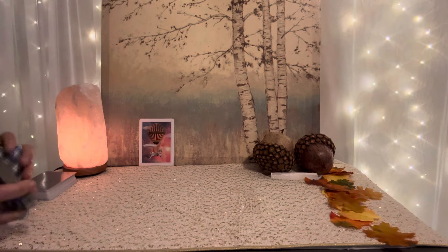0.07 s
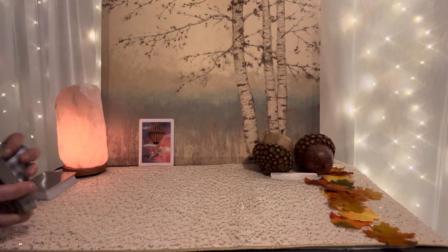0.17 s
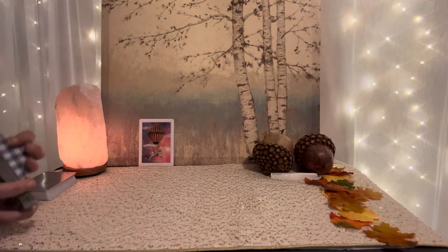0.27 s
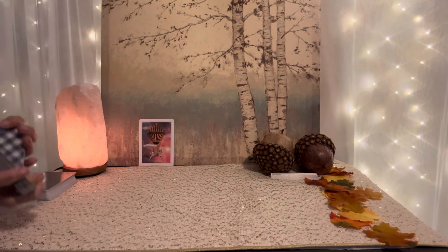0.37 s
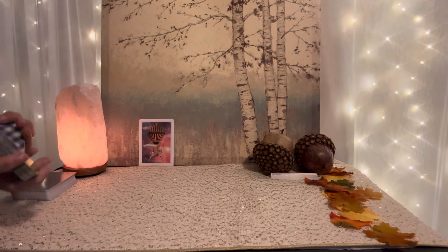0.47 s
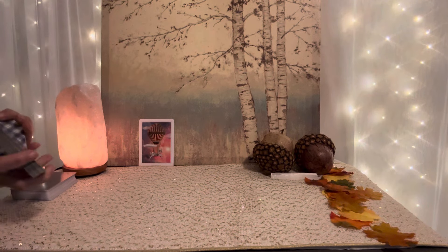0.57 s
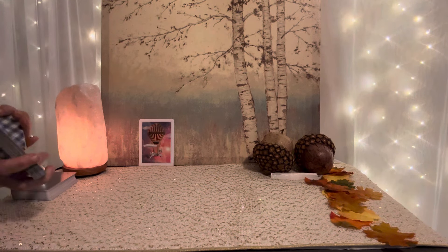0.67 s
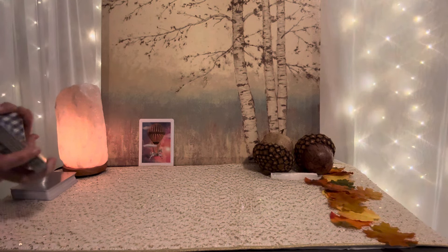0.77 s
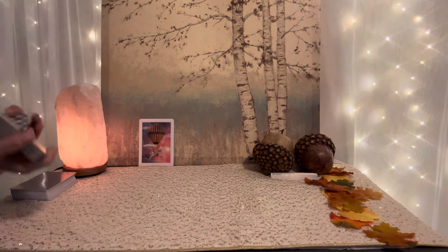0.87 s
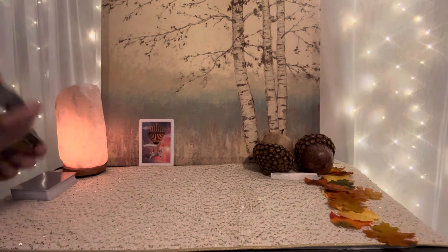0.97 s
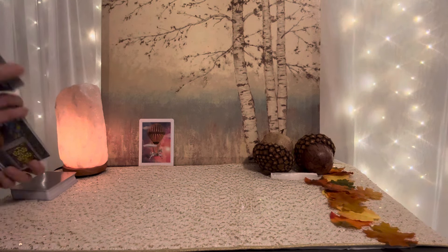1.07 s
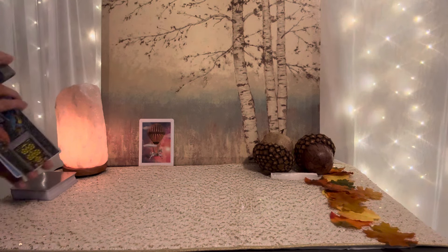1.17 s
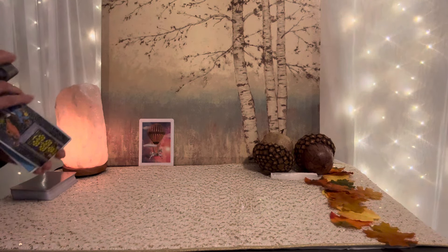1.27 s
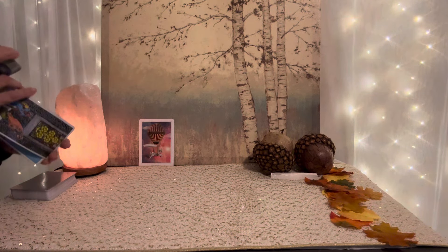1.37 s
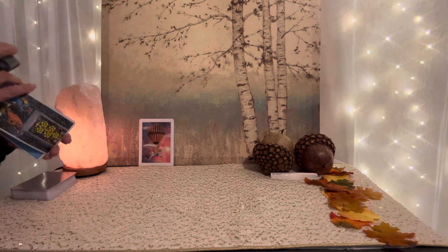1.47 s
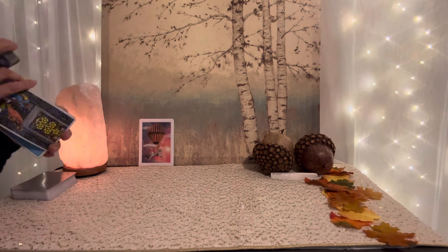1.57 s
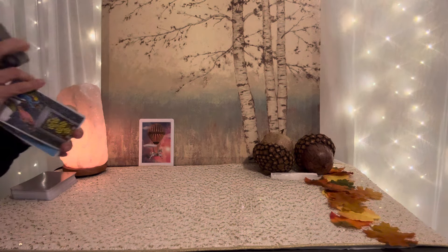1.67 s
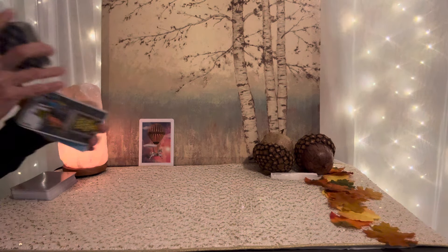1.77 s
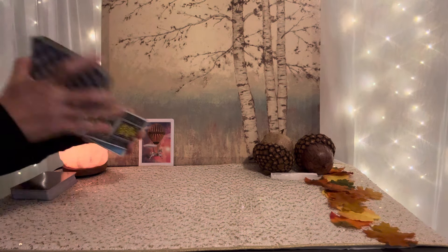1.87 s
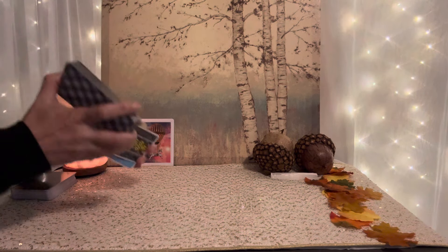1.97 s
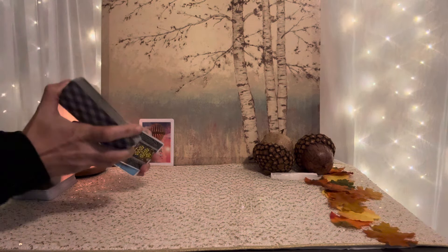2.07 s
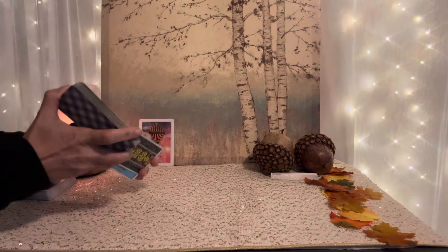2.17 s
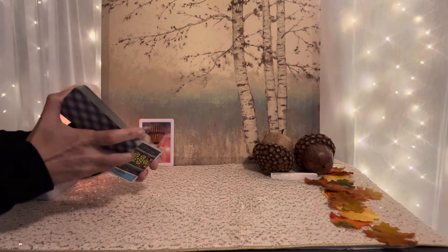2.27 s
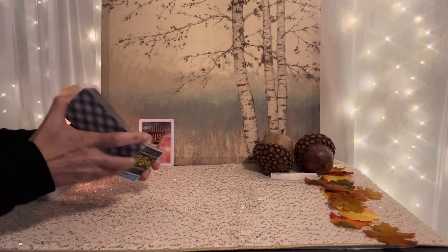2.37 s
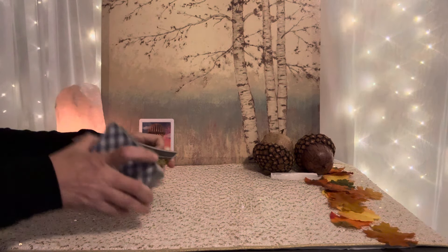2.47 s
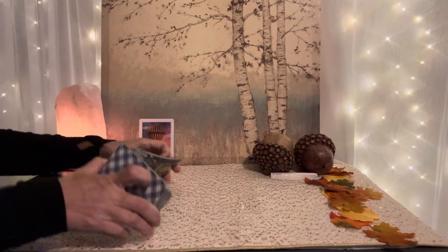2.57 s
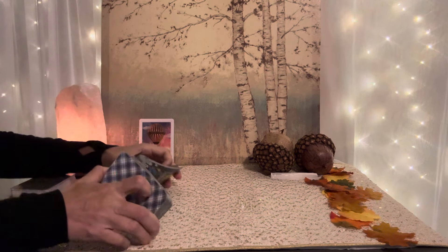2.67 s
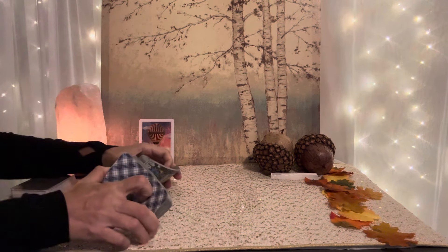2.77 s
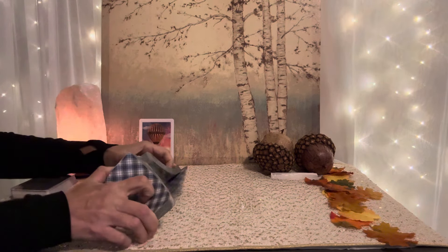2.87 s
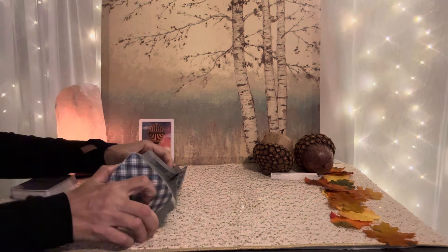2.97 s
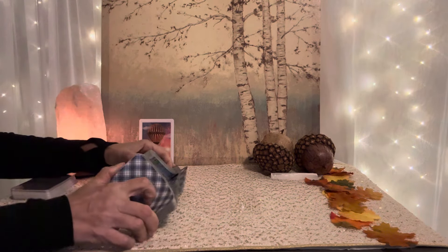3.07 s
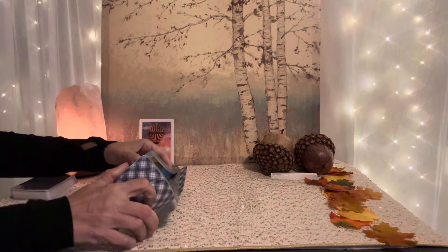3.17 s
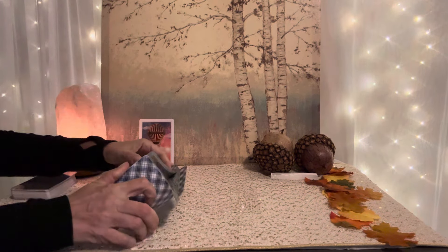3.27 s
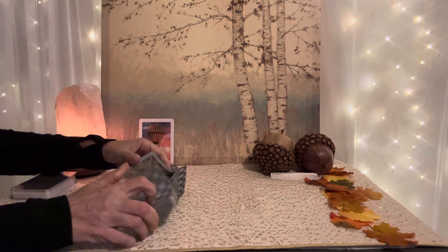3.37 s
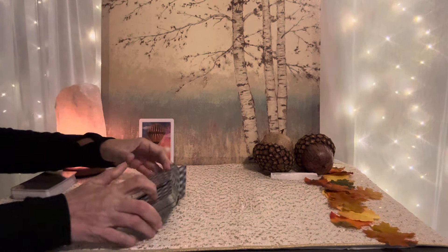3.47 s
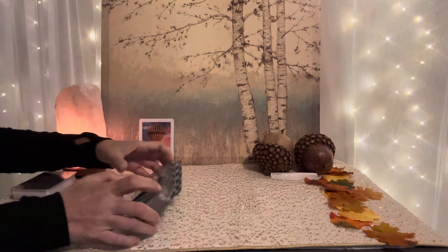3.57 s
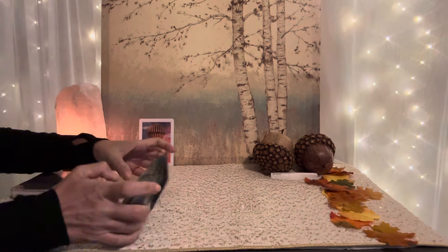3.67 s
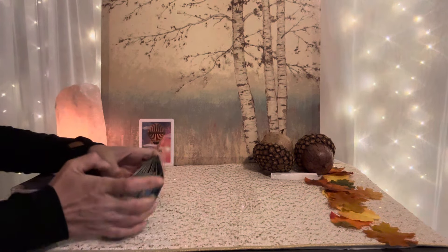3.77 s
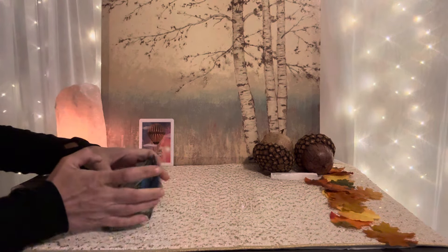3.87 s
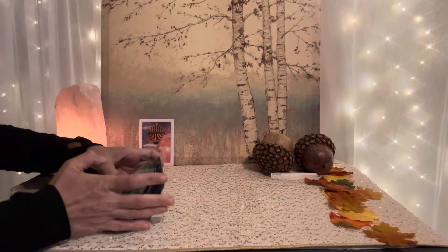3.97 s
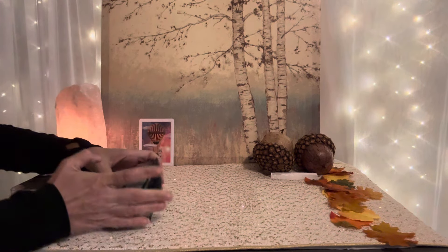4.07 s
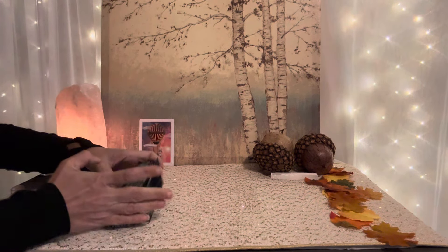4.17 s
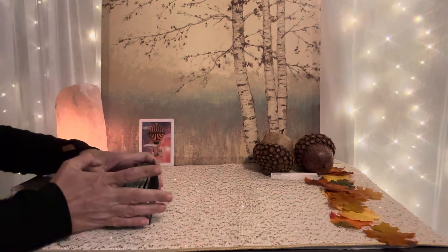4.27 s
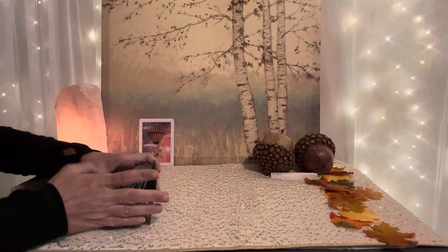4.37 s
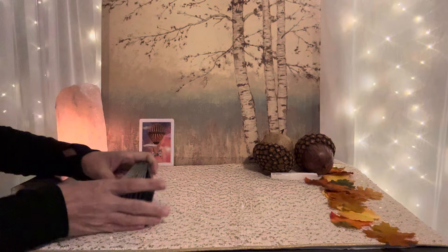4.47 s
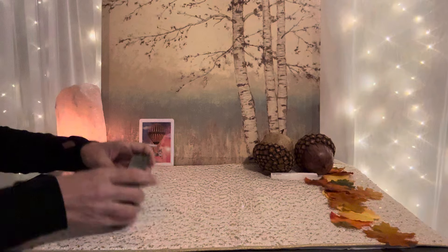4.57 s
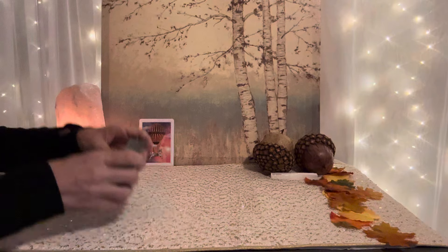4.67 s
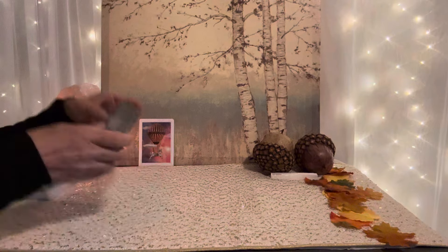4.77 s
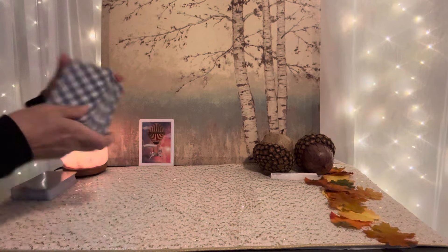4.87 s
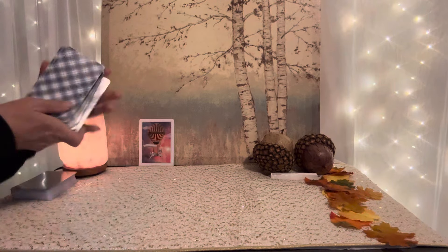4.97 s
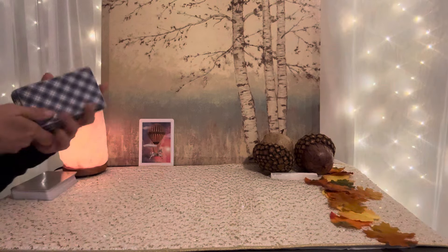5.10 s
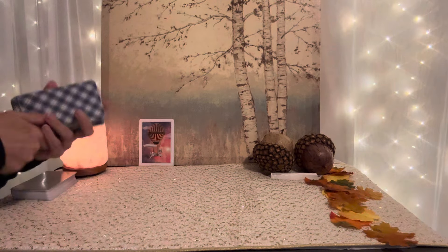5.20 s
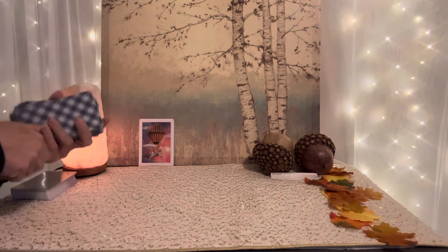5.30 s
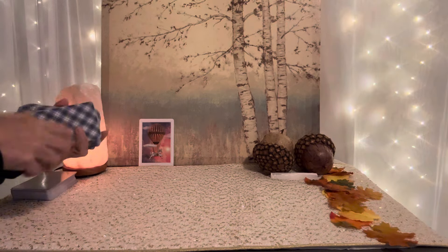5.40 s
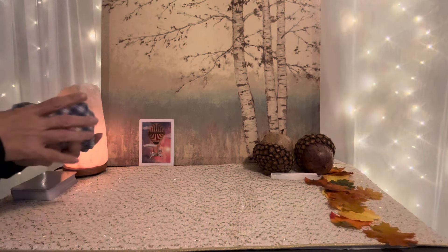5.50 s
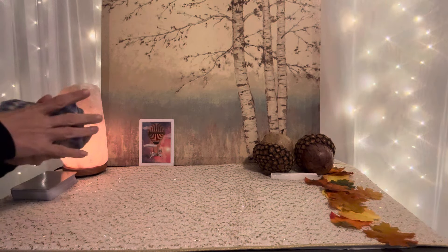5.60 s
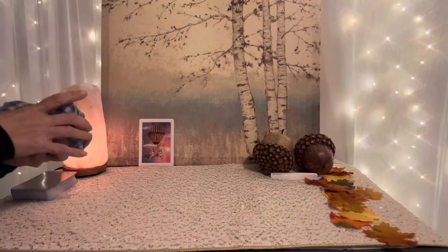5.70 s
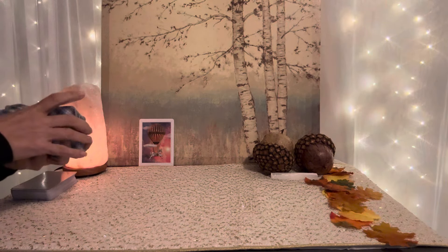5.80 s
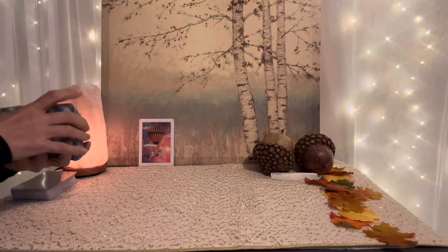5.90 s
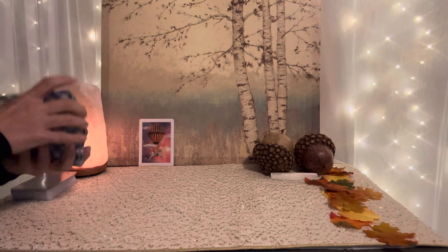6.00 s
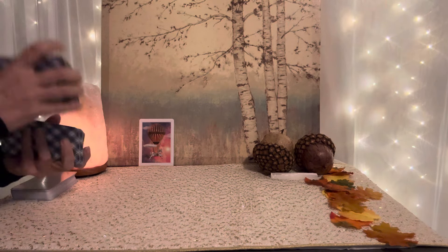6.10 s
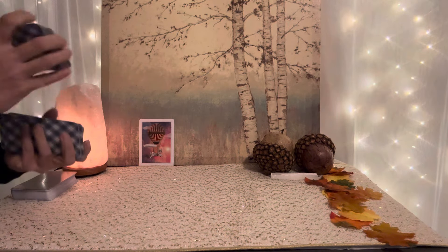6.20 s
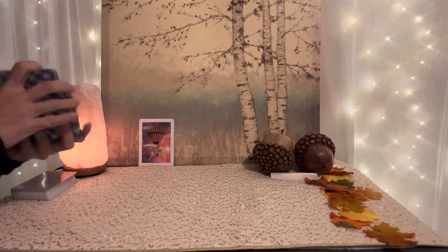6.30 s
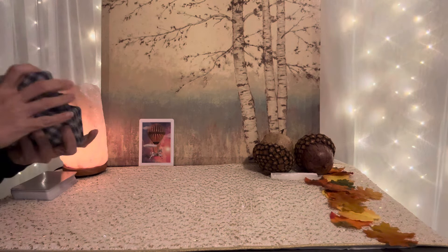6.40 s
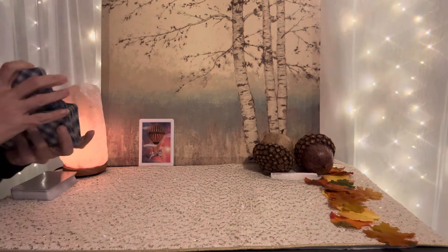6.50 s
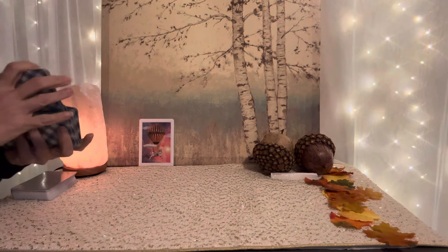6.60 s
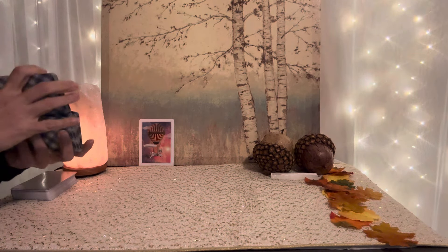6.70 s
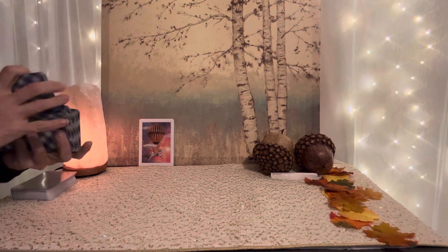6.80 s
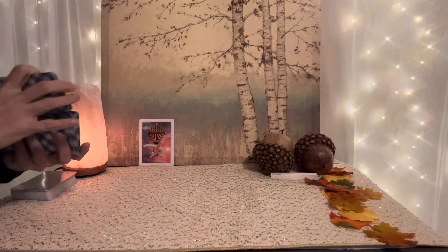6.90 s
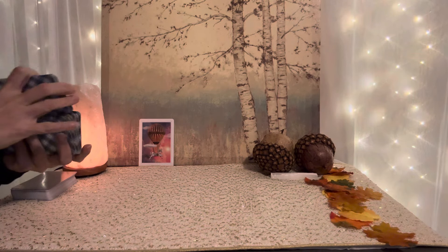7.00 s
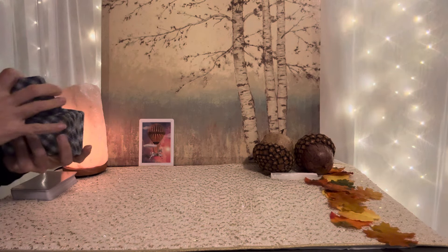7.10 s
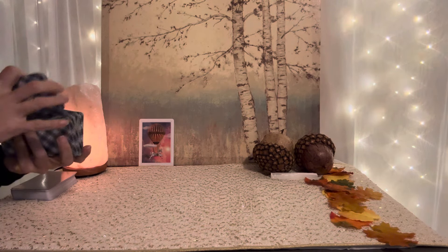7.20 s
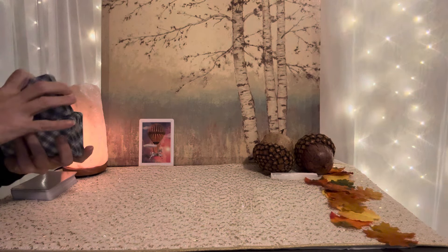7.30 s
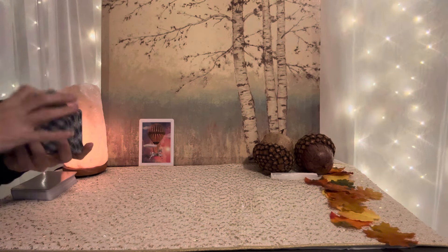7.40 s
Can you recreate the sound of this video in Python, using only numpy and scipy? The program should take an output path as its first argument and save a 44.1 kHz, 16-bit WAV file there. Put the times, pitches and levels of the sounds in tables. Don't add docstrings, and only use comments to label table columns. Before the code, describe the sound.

Close in a small soft room, stiff cards tick and brush very quietly in the hands. A small sharp click comes first, then a loud, uneven riffle snaps edge after edge over a low table boom. Soft thuds, grainy sliding and light taps follow as the deck is squared and cut, with one crisp clack near the end. Faint hum, floor rumble and microphone hiss remain underneath.

```python
import sys
import numpy as np
from scipy import signal
from scipy.fft import rfft, irfft
from scipy.io import wavfile
from scipy.ndimage import uniform_filter1d, map_coordinates

SR = 44100
rng = np.random.default_rng(int(sys.argv[2]) if len(sys.argv) > 2 else 0)


def int16_out(signal):
    q = np.round(np.clip(np.atleast_2d(signal).T, -1, 1) * 32767)
    wavfile.write(sys.argv[1], SR, q.astype(np.int16))


def nominal_scale(level):
    x = np.asarray(level, float) / 20
    return 10 ** x


N = 328545
OPPOSITE = np.array([[1.], [-1.]])

# time in seconds, faces rushing past each other in dB,
# pressure on the table in dB.
RIFFLE_MOTION = [
    [(2.79, -98, -65.5), (2.9, -68, -34), (2.97, -61, -37.5), (3.04, -42.5, -30.5), (3.15, -47.5, -27),
     (3.3, -42.5, -24.5), (3.36, -40.5, -28.5), (3.46, -49, -32), (3.56, -79, -66)],
]


def unit(x):
    return x / np.sqrt(np.mean(x ** 2))


def band(x, lo_hz, hi_hz, order=2):
    return signal.sosfilt(signal.butter(order, [lo_hz, hi_hz], "band", fs=SR, output="sos"), x)


def colour(x, points):
    hz, db = np.transpose(points)
    f = np.arange(N // 2 + 1) * SR / N + 1
    return irfft(rfft(x) * nominal_scale(np.interp(np.log(f), np.log(hz), db)), N)


def walk(rate):
    k = int(SR / rate)
    held = np.repeat(rng.standard_normal(N // k + 1), k)
    return 1.5 * uniform_filter1d(uniform_filter1d(held, k), k)[:N]


def hump(t, start, end):
    return np.sin(np.pi * np.clip((t - start) / (end - start), 0, 1)).clip(0)


def riffle_gains():
    t = np.arange(N) / SR
    s, rush_db, press_db = np.transpose(RIFFLE_MOTION[0])
    return [nominal_scale(np.interp(t, s, db, -200, -200)) for db in (rush_db, press_db)]


def snaps(events, spread, slap_db, t60_s, shorter_per_db):
    soft_below_db, softer_per_db, longer_per_db = -38.5, -0.88, 0.07
    slap_per_crack_db, usual_crack_db = 0.43, -19.5
    out, t = np.zeros((2, N + 2100)), np.arange(2048) / SR
    noise = rng.standard_normal((len(events), 3, 2048))
    for (s, db, hz, crack_db), (ring_noise, crack_noise, slap_noise) in zip(events, noise):
        softness = max(soft_below_db - db, 0)
        t60 = np.clip(t60_s * np.exp(-shorter_per_db * db + longer_per_db * softness), .002, .03)
        rise = 1 - np.exp(-t / (.065 * t60 * np.exp(softer_per_db * softness)))
        fade = rise * np.exp(-np.log(1000) * t / t60)
        ring = .62 * np.sin(2 * np.pi * hz * t) + .42 * unit(band(ring_noise, .7 * hz, 1.5 * hz))
        dullness_db = min(crack_db, usual_crack_db) - usual_crack_db
        slap = nominal_scale(slap_db + slap_per_crack_db * dullness_db) * unit(band(slap_noise, 450, 3600))
        bright = unit(band(crack_noise, 4800, 14500))
        crack_fade = np.exp(-t / (0.038 * t60)) + 0.12 * np.exp(-t / 0.003)
        crack = 10.0 * nominal_scale(crack_db) * bright * rise * crack_fade
        right_lag = int(np.clip(spread * slap_noise[0], -5, 5))
        for side, lag in zip(out, (0, right_lag)):
            i = int((s + .0008) * SR) + lag
            side[i:i + 2048] += nominal_scale(db) * ((ring + slap) * fade + crack)
    return out[:, :N]


def riffle():
    # start in seconds, peak in dB, card ring in Hz, crack in dB.
    edges = [(2.852, -44, 606, -34), (2.864, -41.5, 1211, -22.5), (2.878, -31, 1094, -17.5),
             (2.896, -24.5, 1272, -13.5), (2.915, -22.5, 490, -24), (2.937, -27, 991.3, -18),
             (2.971, -19, 562.4, -26.5), (2.985, -14.5, 2184, -18.5), (3.012, -17, 1050, -12),
             (3.017, -8, 1804, -22), (3.053, -6, 1130, -18), (3.066, -19, 1004, -7),
             (3.0838, -13, 600, -29), (3.105, -3.5, 2270, -24.5), (3.117, -11.5, 1637, -24.5),
             (3.134, -11, 900, -18), (3.1418, -0.5, 910, -21), (3.151, -8, 1720, -19),
             (3.159, -3, 591.2, -14.5), (3.199, -22.5, 902.3, -29), (3.221, -4.5, 1760, -13.5),
             (3.264, -5, 704.2, -28.5), (3.293, -16, 900, -28.5), (3.298, -4, 2295, -12.5),
             (3.307, -8.5, 1011, -19.5), (3.3125, 3, 1796, -28), (3.375, -6, 5230, -16),
             (3.399, -20, 888.2, -20), (3.431, -14.5, 1085, -41), (3.45, -14, 751, -23)]
    return snaps(edges, 2.9, slap_db=-3, t60_s=0.0065, shorter_per_db=0.045)


def ticks():
    # start in seconds, peak in dB, card
    # ring in Hz, crack in dB.
    single_ticks = [(0.191, -63, 870, -27), (0.778, -67, 3110, -60), (0.925, -51.5, 1134, -26),
                    (0.931, -52.5, 1735, -13), (1.531, -67, 2250, -49.5), (1.571, -51, 454, -45),
                    (2.092, -33.5, 2480, -21), (2.142, -61, 1045, -24), (2.178, -62, 2440, -27.5),
                    (2.209, -49, 780, -17.5), (2.823, -54.5, 1510, -30),
                    (3.371, -16, 970, -16), (3.455, -18, 3840, -39.5), (3.464, -21, 3500, -26.5),
                    (3.622, -58.5, 903, -15), (3.758, -39, 1034, -75.5), (3.777, -47, 1046, -52),
                    (3.798, -38, 1490, -48), (3.849, -54.5, 1365, -31.5), (4.422, -54, 1210, -24.5),
                    (4.458, -55, 1530, -40.5), (4.576, -49.5, 2540, -25), (4.632, -40, 3200, -13),
                    (4.823, -59, 3213, -41), (4.837, -59, 734, -4.5), (4.894, -59.5, 1590, -8),
                    (4.921, -54.5, 2160, -24), (4.93, -50, 510, -24), (5.104, -58, 537, -40),
                    (5.239, -51.5, 4720, -19.5), (6.09, -69.5, 4200, -5.5), (6.287, -30, 950, -13),
                    (6.287, -17.5, 2133, -35), (6.303, -18.5, 1127, -14), (6.308, -20, 1600, -27),
                    (6.317, -33, 1489, -33), (6.724, -64, 1090, -27.5), (6.841, -41.5, 2380, -50),
                    (7.023, -31.5, 715, -37), (7.024, -34, 1485, -53.5), (7.152, -52.5, 1861, -41.5)]
    return snaps(single_ticks, 0.93, slap_db=-0.5, t60_s=0.01, shorter_per_db=0)


def flaps():
    # start in seconds, peak in dB, ring in Hz, t60 in seconds.
    in_riffle = [(2.889, -28.5, 1208, .012), (2.897, -24.5, 2000, .01), (2.902, -19.5, 456.1, 0.019),
                 (2.917, -24, 1062, .012), (2.941, -28.5, 800.5, 0.018), (2.972, -27, 2207, 0.018),
                 (2.9844, -24, 4550, 0.00088), (2.988, -15, 1000, .012), (2.987, -12.5, 2180, .01),
                 (3.008, -18, 905.2, 0.011), (3.009, -17.5, 2200, 0.033), (3.014, -25, 2500, 0.0026),
                 (3.047, -22, 1100, .01), (3.055, -9.5, 3000, 0.0011), (3.073, -18.5, 600, 0.017),
                 (3.084, -8, 1000, 0.0062), (3.108, -17, 3015, 0.0078), (3.137, -14, 800, 0.019),
                 (3.152, -18, 3000, .01), (3.1995, -18.5, 1200, 0.009), (3.203, -17.5, 893.4, .01),
                 (3.2224, -11, 1710, 0.014), (3.262, -10.5, 1786, 0.0094), (3.265, -11, 560.4, .012),
                 (3.2937, -10.5, 800, 0.007), (3.2986, -6.5, 6500, 0.0023), (3.309, -12.5, 2495, 0.031),
                 (3.315, -11.5, 1499, .015), (3.319, -14.5, 2512, 0.019), (3.345, -19.5, 1500, .008),
                 (3.3725, -14.5, 3000, 0.0016), (3.3754, -3, 5100, 0.0034), (3.39, -20.5, 2467, 0.0071),
                 (3.4, -17, 926.3, .012), (3.447, -24, 577.3, 0.023), (3.454, -29, 824, 0.022),
                 (3.472, -35.5, 805.7, 0.036), (3.02, -19.5, 555.5, 0.0225), (3.11, -14.5, 522, 0.021),
                 (2.885, -29, 557, 0.018)]
    in_handling = [(0.19, -53, 1187, 0.022), (0.19, -59, 1670, 0.024), (0.776, -56, 3050, 0.026),
                   (4.632, -38, 3190, 0.0054), (4.632, -57, 1645, 0.0067), (4.782, -62.5, 2016, 0.0055),
                   (4.826, -50, 3203, .006), (4.838, -58, 7024, 0.0305), (4.895, -58, 6100, 0.015),
                   (4.925, -51.5, 2226, 0.0294), (4.936, -48, 2000, 0.006), (5.236, -47, 4910, 0.055),
                   (5.241, -42, 3100, 0.016), (5.241, -53.5, 887, 0.0136), (5.243, -53.5, 2260, .03),
                   (2.21, -43, 3420, 0.007), (2.54, -53, 4050, 0.0042), (3.799, -40.5, 994, 0.007),
                   (0.935, -61, 2984, 0.029), (6.305, -33.5, 557, 0.02), (6.287, -45, 7550, .005),
                   (6.289, -30, 967, 0.03), (6.3024, -14, 2650, 0.004), (6.3032, -20, 5630, 0.0033),
                   (6.3035, -21, 4000, 0.0073), (6.305, -35, 880, 0.0153), (6.315, -47, 1483, 0.016),
                   (6.354, -41.5, 1310, 0.018), (6.841, -47, 1959, 0.02468), (6.841, -45, 2600, 0.0126),
                   (6.852, -58.5, 580, 0.035), (7.025, -39, 1855, 0.017), (7.024, -45, 2720, 0.0127),
                   (7.024, -35, 894, 0.015), (7.024, -48, 5504, 0.0043), (7.152, -50.5, 1910, 0.021),
                   (7.384, -61, 1500, 0.0069), (2.791, -54, 2590, 0.014), (2.792, -53, 880, 0.016),
                   (2.818, -50, 880, 0.012), (2.848, -62, 3750, .006), (4.037, -61, 1140, .008),
                   (4.068, -54, 1500, 0.0062), (4.095, -51.5, 2540, .008), (4.201, -61, 2590, .008),
                   (4.219, -52, 1785, .006), (4.236, -56, 2600, .006), (6.723, -60, 1070, 0.013),
                   (6.809, -60, 700, 0.0077)]
    out, t = np.zeros(N + 4096), np.arange(4096) / SR
    rough = np.tile(walk(500), 2)
    for s, db, hz, t60 in in_riffle + in_handling:
        i = int(s * SR)
        wobble = 1.3 * min(hz / 2500, 1) * (rough[i:i + 4096] - rough[i])
        fade = (1 - np.exp(-t / (0.043 * t60))) * 1000 ** (-t / t60)
        out[i:i + 4096] += 1.3 * nominal_scale(db) * np.sin(2 * np.pi * hz * t + wobble) * fade
    return out[:N]


def clicks():
    # start in seconds, peak in dB, width in ms.
    releases = [(2.093, -40, 0.12), (2.9389, -28, 0.12), (2.9722, -20, 0.2), (2.9863, -16, 0.12),
                (3.0142, -18, 0.12), (3.0549, -10, 0.12), (3.084, -12, 0.12), (3.1059, -8, 0.12),
                (3.1424, -10, 0.12), (3.1597, -10, 0.12), (3.1997, -21, 0.12), (3.222, -7, 0.12),
                (3.265, -11, 0.12), (3.2943, -13, 0.12), (3.2991, -5, 0.12), (3.3732, -16, 0.12),
                (3.376, -6, 0.12), (3.4004, -18, 0.12), (3.451, -25, 0.25), (3.7995, -47, 0.2),
                (4.6332, -37, 0.12), (5.241, -54, 0.12), (6.3038, -22, 0.12), (7.0261, -38, 0.12)]
    out, t_ms = np.zeros(N), np.arange(-64, 64) / SR * 1000
    for s, db, width_ms in releases:
        i = int(s * SR)
        u = t_ms / (width_ms / 2) - 1
        out[i - 64:i + 64] -= 1.5 * nominal_scale(db) * u * np.exp(-u ** 2 / 2)
    return out


def swishes():
    # start in seconds, end
    # in seconds, level in dB, brightness in dB.
    face_slides = [(0, 0.063, -87, 10.5), (0.178, 0.207, -79, -4.5), (0.335, 0.377, -74.5, 0),
                   (0.76, 0.852, -79.5, 4), (0.898, 1.001, -72.5, 7), (1.06, 1.106, -82.5, 12.5),
                   (1.163, 1.414, -82.5, 2), (1.434, 1.534, -86, 1.5), (1.555, 1.647, -76.5, 5),
                   (1.707, 1.79, -94.5, 12), (1.84, 1.883, -92, 12.5), (2.079, 2.164, -69, 5),
                   (2.177, 2.249, -63, -2.5), (2.534, 2.582, -68.5, 3),
                   (3.48, 3.614, -63.5, -1), (3.58, 3.723, -71, -2), (3.74, 3.91, -57, 2),
                (3.907, 3.986, -73, 1), (4.031, 4.108, -62.5, 1), (4.115, 4.196, -81, -2),
                (4.181, 4.277, -68, 1), (4.317, 4.424, -91, -11), (4.395, 4.494, -68.5, 0),
                (4.487, 4.6, -69, -1), (4.52, 4.677, -71, -1), (4.643, 4.816, -76, 5),
                (4.807, 4.966, -65.5, 6.5), (4.956, 5.099, -74, 7.5), (5.078, 5.153, -72, 7.5),
                (5.17, 5.294, -75.5, 12), (5.215, 5.343, -74, 8), (5.834, 6.004, -75.5, 6),
                (5.98, 6.14, -78, 8), (6.286, 6.395, -53, 1), (6.371, 6.463, -71, -1.5),
                (6.472, 6.701, -91, 5), (6.252, 6.29, -81, -1), (6.717, 6.814, -69.5, 3.5),
                (6.845, 6.958, -67.5, 2.5), (6.957, 7.036, -76, -6.5), (7.019, 7.122, -61, 1),
                (7.123, 7.181, -71.5, -5), (7.175, 7.238, -60, 0), (7.22, 7.34, -73.5, -2),
                (7.333, 7.443, -58.5, 4.5)]
    t, power = np.arange(N) / SR, np.zeros((3, N))
    for start, end, db, bright_db in face_slides:
        part = slice(max(int((start - .02) * SR), 0), int((end + .02) * SR))
        dbs = db + np.array([6 - 1.26 * bright_db, 0, -7.5 + 1.16 * bright_db])
        power[:, part] += nominal_scale(dbs[:, None] + 1.0) ** 2 * hump(t[part], start - .015, end + 0.022) ** 3.08
    return np.sqrt(power)


def slide():
    # frequency in Hz, level in dB.
    hiss_shape = [(3000, -42.5), (4200, -1), (6500, -1.5), (10000, -1.5), (13000, -10), (15500, -13),
                  (16500, -30.5)]
    rush, _ = riffle_gains()
    body, scrape, hiss = swishes() + rush * nominal_scale(np.array([[-2.5], [0], [1.5]]))
    grain_db = 3.2 * rng.exponential(size=N // 40 + 1).clip(0, 3.5).repeat(40)[:N]
    size = nominal_scale(grain_db + 2.2 * walk(90))
    shared, differing = rng.standard_normal((2, N)) * size
    grains = shared + (0.58 * differing + 0.2 * band(differing, 2500, 9000)) * OPPOSITE
    low, mid = unit(band(grains, 600, 1700)), unit(band(grains, 1200, 3700))
    high = unit(colour(grains, hiss_shape))
    return 0.4 * body * low + 1.0 * scrape * mid + 1.783 * hiss * high


def drags():
    # start in seconds, end in seconds, resonance in Hz, level in dB.
    corners = [(1.175, 1.41, 3800, -77), (1.255, 1.378, 2600, -69.5), (1.2, 1.27, 3200, -75),
               (1.44, 1.5, 2130, -79), (1.45, 1.52, 2900, -80), (1.515, 1.555, 2330, -68),
               (1.515, 1.55, 2100, -79), (1.568, 1.605, 2510, -64.5), (1.06, 1.123, 4500, -70),
               (2.55, 2.59, 4200, -72), (3.83, 3.88, 1289, -60), (1.584, 1.69, 4700, -72.5),
               (1.62, 1.7, 2140, -82), (1.71, 1.745, 3070, -72), (1.75, 1.775, 2550, -70.5),
               (2.795, 2.818, 1900, -74), (3.318, 3.362, 2500, -29), (3.242, 3.262, 1750, -33),
               (3.47, 3.5, 800, -43.5), (7.345, 7.44, 2240, -61), (7.36, 7.41, 2100, -66),
               (7.35, 7.445, 4000, -62.5), (5.17, 5.204, 9700, -77), (4.43, 4.92, 9300, -73),
               (6.255, 6.28, 760, -72)]
    t, out = np.arange(N) / SR, np.zeros(N)
    noise = rng.standard_normal(N) * nominal_scale(3 * walk(40))
    for start, end, hz, db in corners:
        blur = 1 + hz / 44920
        tone = unit(band(noise, hz / blur, hz * blur, order=1))
        out += nominal_scale(db) * tone * np.sqrt(hump(t, start, end))
    return out


def whistle():
    # start in seconds, end in seconds, pitch in Hz, level in dB.
    squeaks = [(6.94, 7.025, 1400, -68), (7.03, 7.2, 1400, -69), (7.17, 7.33, 1400, -72),
               (7.4, 7.43, 1430, -68), (6.96, 7.01, 3350, -81), (7.09, 7.16, 3350, -79)]
    t, out, half_width_hz = np.arange(N) / SR, np.zeros(N), 115
    noise = rng.standard_normal(N) * nominal_scale(2 * walk(90))
    for start, end, hz, db in squeaks:
        tone = unit(band(noise, hz - half_width_hz, hz + half_width_hz))
        out += nominal_scale(db) * tone * hump(t, start, end) ** .3
    return out


def thuds():
    # start in seconds, peak in dB, table ring in Hz, t60
    # in seconds.
    table_contacts = [(0.004, -41, 123, 0.0655), (0.189, -49, 145, 0.059), (0.457, -48.5, 72.6, 0.073),
                      (1.568, -71, 155.7, 0.055), (2.895, -21, 159.6, 0.025), (3.153, -20, 172, 0.0487),
                      (3.2325, -12, 144, 0.037), (3.328, -17.5, 110, 0.036), (3.3867, -12.5, 123, 0.025),
                      (3.4115, -17, 115, 0.049), (3.408, -25.5, 111.7, 0.24), (3.631, -35, 129.6, 0.087),
                      (3.7222, -37, 136, 0.079), (4.589, -40.5, 74.2, 0.066), (5.621, -54.5, 72.8, 0.076),
                      (0.004, -50.5, 183, 0.17), (0.194, -48.5, 356, 0.03), (1.571, -53.5, 205, 0.034),
             (3.639, -46, 296.4, 0.11), (4.586, -43, 278.6, 0.028), (5.624, -58, 239, 0.082)]
    out, t = np.zeros(N + 8192), np.arange(8192) / SR
    for s, db, hz, t60 in table_contacts:
        i = int(s * SR)
        fade = (1 - np.exp(-t / 0.001)) * 1000 ** (-t / t60)
        out[i:i + 8192] -= 1.4 * nominal_scale(db) * np.sin(2 * np.pi * hz * t) * fade
    return out[:N] * nominal_scale(1.8 * OPPOSITE)


def tremors():
    # time of the peak in seconds, peak in dB, time from the peak to either end in seconds.
    swells = [(0.071, -52.5, 0.069), (0.239, -52.5, 0.19), (0.47, -59.5, 0.16), (0.712, -53.5, 0.13),
              (0.998, -53, 0.21), (1.27, -60, 0.082), (1.608, -67.5, 0.53), (2.199, -60.5, 0.33),
              (2.577, -62, 0.082), (2.796, -51.5, 0.091), (3.62, -36, 0.01), (3.679, -43.5, 0.059),
              (3.835, -55, 0.093), (3.957, -52.5, 0.048), (4.149, -56, 0.4), (4.621, -51.5, 0.24),
              (4.934, -55.5, 0.1354), (5.287, -65.5, 0.302), (5.665, -56.5, 0.176), (5.902, -60, 0.23),
              (6.218, -54, 0.1426), (6.461, -51.5, 0.12), (6.651, -58, 0.18), (6.981, -53, 0.309),
              (7.222, -51.5, 0.2), (7.401, -61, 0.15)]
    t = np.arange(N) / SR
    _, pressure = riffle_gains()
    rumble = nominal_scale(-71) + sum(nominal_scale(db) * hump(t, s - length, s + length) ** 2 for s, db, length in swells)
    slid = uniform_filter1d(swishes()[0], int(0.11 * SR))
    on_table = (t > 2.2) & (t < 4.75)
    slid = slid * np.where(on_table, 1, nominal_scale(-5.5))
    return rumble + nominal_scale(-9.5) * pressure, nominal_scale(-82.5) + nominal_scale(4) * slid + pressure


def shake():
    # frequency in Hz, width in Hz, level in dB.
    modes = [(72, 17, -3), (112, 14, -0.5), (137, 13, 5), (216, 60, -4), (267, 80, -21.5)]
    rumble_hz, rumble_width_hz, hum_hz, hum_db = 52, 8, 154, -66.5
    rumble, boom = tremors()
    t = np.arange(N) / SR
    floor_hz = rumble_hz + rumble_width_hz / 2 * walk(30)
    floor = np.sin(2 * np.pi * np.cumsum(floor_hz) / SR) * nominal_scale(3 + 1.5 * walk(20))
    waver = 1.1 * walk(12)
    hum = nominal_scale(hum_db + 3.5 + waver) * np.sin(2 * np.pi * hum_hz * t + 0.38 * waver)
    shared, differing = [
        unit(sum(nominal_scale(db) * unit(band(push, f - w / 2, f + w / 2, order=1)) for f, w, db in modes))
        for push in rng.standard_normal((2, N))]
    table_top = shared + 0.3 * band(differing, 170, 600) * OPPOSITE
    return rumble * floor + hum + .8 * boom * table_top


def room(x):
    t60_s, treble_t60_s = 0.18, 0.12
    t = np.arange(int(.7 * SR)) / SR
    noise = rng.standard_normal((2, 2, len(t)))
    low = band(noise[0], 150, 2500) * 1000 ** (-t / t60_s)
    high = band(noise[1], 1700, 15000) * 1000 ** (-t / treble_t60_s) * .6
    tail = (low + high) * np.clip(t / 0.0061, 0, 1)
    tail = tail[0] * .3 + tail
    return signal.fftconvolve(x[None], tail / np.sqrt(np.sum(tail[0] ** 2)), axes=1)[:, :N]


def air():
    # frequency in Hz, level in dB per Hz.
    spectrum = [(33, -23), (52, -1), (85, -9), (120, -5), (156, -11.5), (202, -12.5), (338, -21),
                (480, -30), (700, -34), (1550, -42.5), (5000, -46), (10000, -46), (13000, -50),
                (16000, -58.5)]
    mid, side = colour(rng.standard_normal((2, N)), spectrum)
    return unit(mid + band(side, 320, 16000, order=1) * OPPOSITE) * nominal_scale(-68.5)


def ports(x):
    # time in seconds, lead of the left port in samples.
    hands = [(.2, 7.2), (.75, 8.2), (1.75, 6.2), (2.25, 0.15), (2.751, .1), (3.75, 0.095), (4.25, 1.9),
             (4.751, 2.94), (5.25, 5.81), (7.301, 5.72)]
    s, lag = np.transpose(hands)
    n = np.arange(N)
    return np.array([x[0], map_coordinates(x[1], [n - np.interp(n / SR, s, lag)], order=3)])


def scene():
    cards = riffle() + ticks() + slide() + drags() + clicks()
    around = nominal_scale(-8.5) * room(cards[0]) + thuds() + shake() + air() + whistle()
    return ports(cards + flaps()) + around


def band_limit(x):
    return signal.sosfilt(signal.butter(12, 17160, fs=SR, output="sos"), x)


def record(dry):
    # frequency in Hz, lead of the left channel in
    phase_steps = [(7300, 6.4), (8800, 9.38), (9700, 9.47), (10600, 12.2), (12800, 13.2), (13600, 15.66),
                   (15000, 15.76), (15900, 18.5)]
    split_hz, top_hz, loud_db, loud_hold_s = 7400, 16000, -22, .004
    f = np.arange(N // 2 + 1) * SR / N
    left, right = rfft(np.tanh(dry / .88) * .88, axis=1)
    share = np.clip((f - split_hz) / 1500 + .5, 0, .998)
    turned = left * np.exp(-1j * np.interp(f, *np.transpose(phase_steps)))
    tied = share * turned + np.sqrt(1 - share ** 2) * right
    treble = uniform_filter1d(np.abs(band(dry[0], 4000, 14000)), int(loud_hold_s * SR))
    loud = np.clip(treble / nominal_scale(loud_db) - .4, 0, .3)
    right = rfft((1 - loud) * irfft(tied, N) + loud * irfft(right, N))
    passed = np.clip((top_hz - f) / 600 + .5, 0, 1) * f ** 4 / (f ** 4 + 40 ** 4)
    return band_limit(irfft(np.array([left, right]) * passed, N, axis=1))


dry = scene()
out = record(dry)
int16_out(out)
```